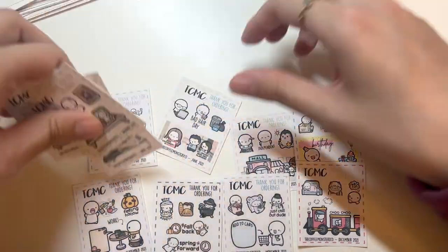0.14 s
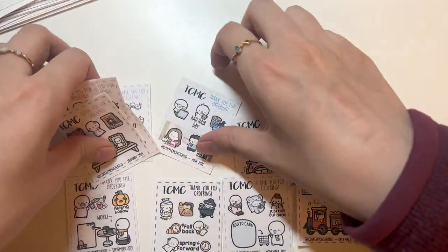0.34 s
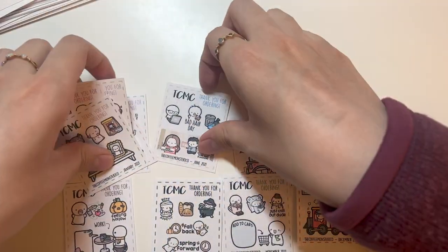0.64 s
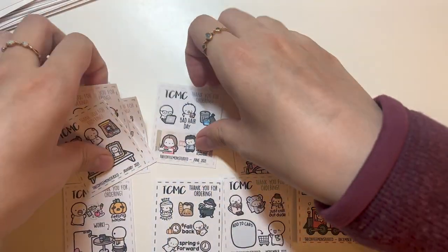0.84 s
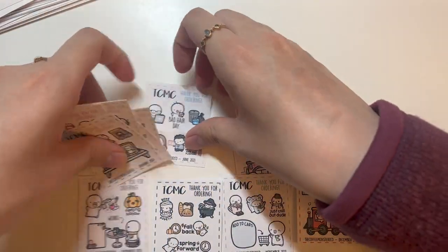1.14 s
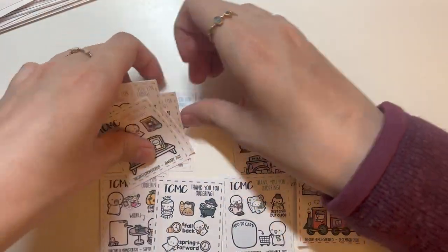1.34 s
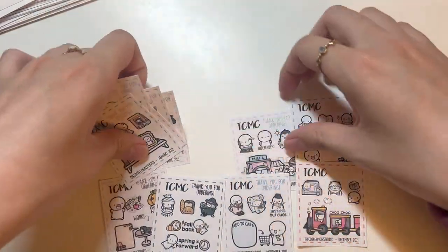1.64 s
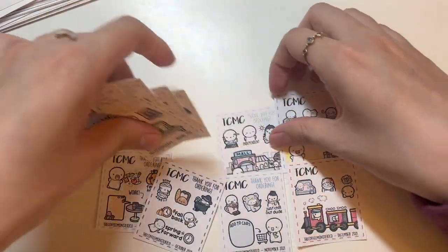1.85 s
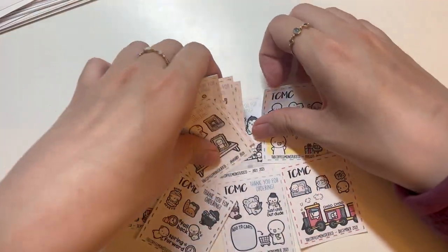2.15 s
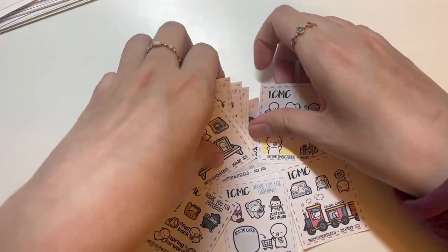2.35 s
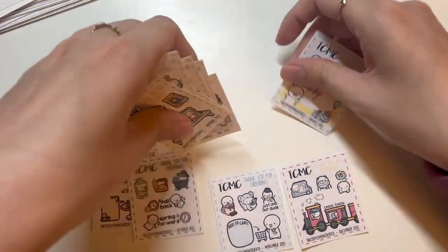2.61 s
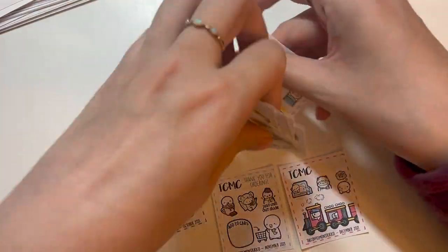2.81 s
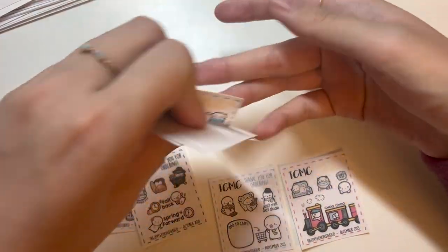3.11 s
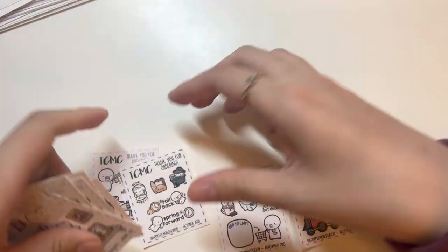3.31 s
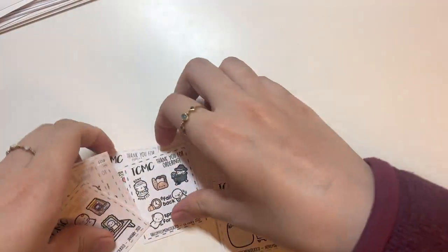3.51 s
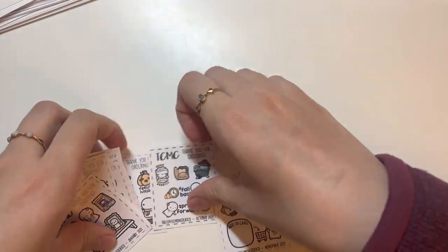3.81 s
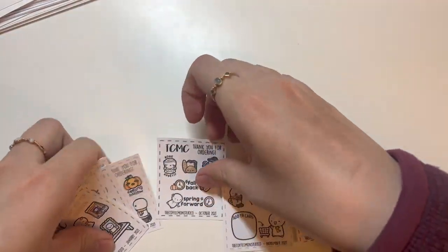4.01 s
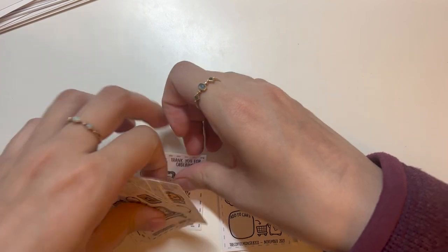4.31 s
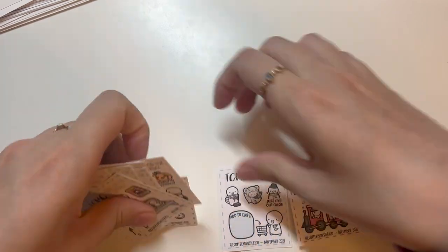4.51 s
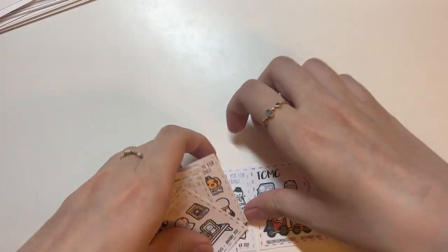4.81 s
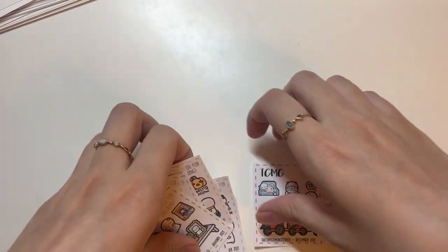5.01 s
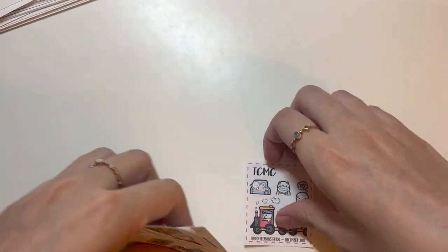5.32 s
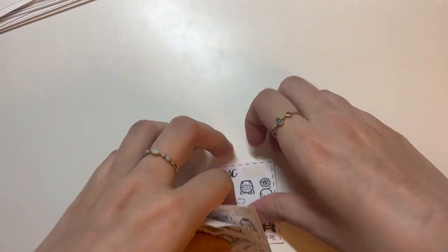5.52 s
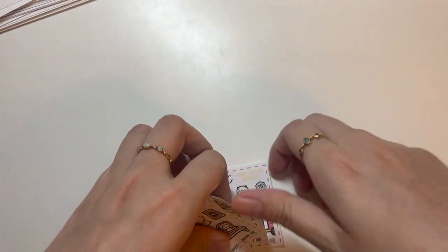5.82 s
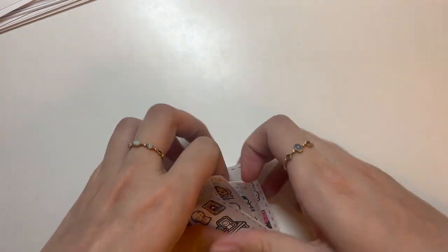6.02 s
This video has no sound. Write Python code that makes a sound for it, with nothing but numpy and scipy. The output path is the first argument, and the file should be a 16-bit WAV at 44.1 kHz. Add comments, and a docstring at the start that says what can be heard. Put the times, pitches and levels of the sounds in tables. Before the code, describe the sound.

Small stiff paper cards are pushed and gathered on a tabletop, close to the microphone. Short, soft, grainy hisses come in uneven strokes, with tiny clicks from card edges and dull fingertip thuds. Rustling grows brighter around two seconds, a sharp snap stands out near four and a half, then the cards shuffle together more continuously. A small quiet room adds faint rumble and hum.

```python
"""Paper hisses first, as small cards are pushed over a table top; then they are picked up and knocked into a stack.
The hiss is grainy shaped noise; card edges snap as millisecond noise bursts through resonances.
Fingertips thud on the table, ringing the modes of its board, and drag on it with a stuttering murmur.
Short wall echoes, low room rumble and a wavering hum lie behind.
Two close microphone ports hear the same sound with a phase turn that grows with pitch."""
import sys
import numpy as np
from scipy import signal
from scipy.fft import rfft, irfft
from scipy.io import wavfile
from scipy.ndimage import uniform_filter1d

SR = 44100
rng = np.random.default_rng(int(sys.argv[2]) if len(sys.argv) > 2 else 0)


def output_pcm(signal):
    """Save a mono or channel-first signal as 16-bit PCM at the path in sys.argv[1].

    Samples are clipped to [-1, 1] before scaling.
    """
    pcm = np.clip(np.atleast_2d(signal).T, -1, 1) * 32767
    wavfile.write(sys.argv[1], SR, np.round(pcm).astype(np.int16))


N = 271215

# strokes of sliding paper: (loudest moment [s], relative hiss level [dB], swell by 20 dB [ms],
# fade by 20 dB [ms], flex of the cards: body below 5.2 kHz re hiss [dB], sheen above 10.2 kHz re hiss [dB])
PAPER_STROKES = [(0.004, -65, 151.0, 55, 5, 9), (0.178, -58.4, 20, 161.0, -4.5, 10),
                 (0.255, -56.5, 50, 48, 5.5, 8), (0.315, -57, 31, 138, 5, 11.5),
                 (0.34, -53, 60, 15, 5.5, 10), (0.39, -55, 38, 40.0, 2, 0.5), (0.442, -59, 8, 80, 5, -1),
                 (0.469, -48, 32, 41, -1, 5), (0.512, -62.5, 29.0, 159.0, 5.5, 5),
                 (0.569, -58.5, 11, 21, 15, 4), (0.61, -67, 30.0, 50.0, 8, 5),
                 (0.659, -68, 21.0, 30.0, 11, 1.5), (0.718, -62, 60, 21.0, 8, 6),
                 (0.788, -67.5, 12, 200, 11.5, 0), (0.86, -65, 146.0, 59, 7, 5),
                 (0.947, -58, 100, 62, 3.7, 6), (0.985, -58, 27, 18, 9, 3), (1.05, -62, 17, 200, 10.5, 8),
                 (1.143, -52.5, 110.0, 205, 1.9, 5), (1.265, -54.5, 65, 73.0, 6.5, 2),
                 (1.373, -53.5, 60.0, 18, -1, -3), (1.479, -63, 167.0, 47.0, 3, 4),
                 (1.522, -59.5, 54.0, 58, 11, -1), (1.627, -55, 76.0, 32, 2.3, -0.3),
                 (1.695, -43, 10, 52, 0, -4), (1.705, -43.5, 56, 35, -3.3, -5),
                 (1.936, -56.5, 183, 80.0, -3.5, 6), (2.02, -67, 40.0, 60.0, 0, -4),
                 (2.105, -59, 14, 100, -2, -2), (2.131, -54.5, 189, 104, 1.5, 1),
                 (2.265, -62, 81.0, 103.0, 4.5, 1), (2.317, -63, 19, 188.0, -8, -1),
                 (2.426, -45.5, 65, 35, 3.5, -9), (2.502, -43.5, 86, 128, -5, -7),
                 (2.756, -60.5, 146, 36.0, 0.5, 5), (2.85, -55.5, 91.0, 123, 3, 6.5),
                 (2.972, -56, 21, 126, -3, 7.5), (3.058, -53.5, 6, 60.0, 2.5, 2),
                 (3.185, -49.5, 35, 40, 0, 2), (3.36, -71.0, 56, 100.0, 1.0, 11),
                 (3.437, -60, 106.0, 98, 3, -2.0), (3.522, -57, 60, 98.0, -4, 2),
                 (3.581, -58, 33.0, 79.0, 3, 7), (3.741, -51, 133, 138, -3, -2.5),
                 (3.865, -56.5, 27.5, 108, 3.5, -2), (3.947, -46, 12, 60, 3, -5),
                 (4.083, -51.5, 121, 94, 4, 4.5), (4.323, -57, 207, 14.0, 3.3, 4),
                 (4.389, -56, 85.0, 21, 3, 5), (4.435, -44.5, 19.5, 107, 5.5, -4),
                 (4.667, -52, 23, 214, -6, 2.5), (4.775, -49.5, 50, 95, 3, -0.5),
                 (4.915, -67, 15, 199, 2, -3), (4.952, -57.5, 117.0, 259.0, 8, 4),
                 (5.109, -58, 97, 22, 10, 7), (5.211, -52.5, 182.0, 83, -2.5, 1.5),
                 (5.345, -57, 13, 103, -14, 9), (5.39, -50.6, 103.0, 128, -5.5, 2.5),
                 (5.633, -55, 118, 50.0, 4.5, 4), (5.694, -48.5, 34, 57.0, -10, -8),
                 (5.8, -68, 100.0, 100.0, 1.0, -9), (5.878, -51, 213.0, 64.0, -0.2, -6),
                 (5.968, -51, 97, 34, 2.5, 4), (6.07, -63, 15, 200, 3, 3),
                 (6.121, -52.5, 294.0, 152.0, 4.5, -0.5)]
# colour of sliding paper: (frequency [Hz], relative level per Hz [dB])
PAPER_COLOUR = [(300, -20.5), (800, -10), (1500, -6.5), (2000, -3), (2700, 2.5), (3300, 0), (4200, -1),
                (5100, 4), (6500, 2.9), (9000, 2), (12000, -2.5), (14800, -6.5), (17000, -52)]
BODY_LINGERS = 1.085  # the body of a stroke fades this many times slower than its hiss

# card edges snapping: (time [s], relative peak level [dB], pitch [Hz], time to scrape peak [ms],
# relative level of the hollow knock [dB], relative level of the crackle [dB])
EDGE_SNAPS = [(0.1697, -47, 7950, 0.85, -33, -20), (0.248, -50, 5070, 0.85, -8, 5),
              (0.405, -46, 4040, 1, -18, -16), (0.4374, -62, 3280, 0.91, -21, -19),
              (0.5632, -30.5, 8070, 0.99, -20, 28), (0.5709, -30, 5040, 1, -6.5, -9),
              (0.6541, -43, 3530, 0.94, 3, -2), (0.7213, -42.5, 5280, 1, -1, -5),
              (0.968, -37.5, 3040, 1, -17, -5), (1.2971, -41, 3200, 0.62, -16, -10),
              (1.3633, -40, 4630, 1, 0, -11), (1.375, -44.5, 4940, 0.85, 3, -6),
              (1.475, -34.5, 3240, 1, -6, -6.5), (1.5195, -29.5, 3120, 0.71, -5.5, -15),
              (1.6541, -38, 4140, 1, -5.5, -6), (1.9275, -54, 6990, 0.9, -31, -6),
              (2.0502, -43.5, 4910, 1, 0, -17), (2.2641, -43.5, 4160, 0.74, 1, -14),
              (2.321, -42.5, 5240, 0.95, -22, -11), (2.412, -24, 4500, 0.43, -9.5, -29),
              (2.7915, -47, 7120, 0.97, -4, -1), (2.83, -39.5, 5100, 0.98, 13, -8),
              (2.919, -32, 5300, 0.85, -5.5, -8.5), (3.0603, -34, 6200, 1, -6.5, -25),
              (3.111, -45.5, 2930, 0.95, 9, -8), (3.1692, -45, 8370, 0.93, -27, 0),
              (3.411, -41, 4730, 1, -21, -26), (3.4525, -49, 3060, 0.69, -16, -12),
              (3.683, -40.5, 3760, 1, -3, -5), (3.8648, -42, 4890, 0.84, -18, -20),
              (3.946, -22, 3050, 1, -32, -6), (4.247, -42.5, 3930, 0.63, -34, -2),
              (4.4352, -5.5, 5320, 0.71, -7, -30), (4.6125, -45, 5200, 0.85, -8, -6),
              (4.666, -42, 5700, 0.81, -34, -29), (4.7755, -42, 8370, 0.97, -25, -14),
              (4.8907, -33, 2400, 0.62, -26, -35), (5.103, -33, 8100, 0.61, 5, 8),
              (5.8583, -35.5, 7850, 1, -6, -18), (5.953, -51, 2900, 0.71, -22, -16),
              (5.9668, -26.5, 5700, 1, -8, -24), (6.1386, -24, 4600, 0.33, -5, -21)]
KNOCK_HZ, CRACKLE_HZ = 1850, 10030

# fingertips landing: (time [s], relative level [dB], weight: tilt at 100 Hz and below [dB],
# nail hardness: relative tilt at 1 kHz and above [dB])
FINGER_THUDS = [(0.252, -34.5, -9.5, -10), (0.261, -30.5, -34, -17), (0.404, -41, -19.5, -11),
                (0.527, -39.5, -15, -6.5), (0.654, -34.5, -17, -13.5), (0.722, -41.5, -14, -13),
                (0.876, -37.5, -24, -13), (0.891, -39, -23, -11), (0.989, -52, -9, -21),
                (1.248, -52, -9, -15), (1.295, -29, -18.5, -15), (1.373, -50.5, 0, -7),
                (1.656, -34, -17.5, -13.5), (2.05, -29.5, -17.5, -14.5), (2.172, -53, -4, -4),
                (2.408, -45.5, -9, 0), (2.83, -72, -11, 20), (2.918, -51.5, -38, -11),
                (3.06, -56, -30, -11), (3.205, -62, 4, 9.5), (3.222, -73, -3, -15),
                (3.41, -32.5, -7.5, -10.5), (3.454, -40, -18, -10.5), (3.503, -41, -39, -10),
                (3.598, -45, -9, -13), (3.617, -47.5, -16, -8), (3.682, -41, -13.5, -7.5),
                (3.785, -50.5, -1.5, -6), (3.869, -38.5, -12.5, -11.5), (4.062, -54, -14, -7),
                (4.309, -67.5, -9, 15), (4.611, -45, -10, -14), (4.776, -34.5, -13.5, -12),
                (4.875, -47, -4.5, -3.5), (5.135, -51, -10, -6), (5.157, -40.5, -20, -12.5),
                (5.335, -58.5, 6, -18), (5.546, -62, 13.5, 8), (5.704, -40.5, -19, -12),
                (5.781, -53, -8, -3), (5.861, -44.5, -7.5, -12), (5.946, -45, -26, -20.5),
                (5.968, -42.5, -14.5, -11), (6.07, -49, -13, -1.5)]
# main modes of the table top: (frequency [Hz], relative level [dB], nominal t60 [s])
BOARD_MODES = [(60.9, 8.5, 0.53), (85.3, 19.5, 0.086), (115.6, 3, 0.75), (186.3, -4, 0.28),
               (235.4, -7.5, 0.14), (285.8, -6.5, 0.21), (340.6, -17, 0.24), (430.7, -6.5, 0.12),
               (531.4, 1, 0.059), (632, -13, 0.26), (797, -13.5, 0.12), (971, -2.5, 0.03),
               (1230, -5.5, 0.05), (1496, -6, 0.03)]
# colour of the first bending wave: (frequency [Hz], relative level per Hz [dB])
WAVE_FRONT = [(60, -31), (200, 4.5), (450, 9.5), (900, -7.5), (1600, -22), (2600, -23)]

# fingers dragging on the board: (start [s], hold [s], murmur of the middle modes [dB],
# coarse scrape in the high modes [dB])
FINGER_DRAGS = [(0.0, 0.0057, -61.5, -72), (0.3, 0.13, -49, -56), (0.432, 0.091, -48, -64),
                (0.55, 0.039, -52.5, -59), (0.67, 0.14, -53, -59.5), (0.85, 0.11, -54.5, -56),
                (1.0, 0.21, -59.5, -63), (1.32, 0.04, -45.5, -57), (1.48, 0.053, -59, -63.5),
                (1.68, 0.043, -51, -76), (1.8, 0.21, -66, -65.5), (2.07, 0.039, -45, -51.5),
                (2.19, 0.14, -59.5, -63.5), (2.41, 0.0096, -56, -52.5), (2.77, .02, -69, -69),
                (2.83, 0.037, -85, -56.5), (2.92, 0.062, -83, -70), (2.965, 0.022, -86, -61),
                (3.06, .15, -89, -66.5), (3.42, 0.16, -52, -54), (3.59, 0.019, -49.5, -56.5),
                (3.7, .12, -55.5, -56.5), (3.87, .1, -55.5, -68), (4.1, 0.11, -88, -71),
                (4.32, 0.21, -70, -69), (4.62, 0.097, -53.5, -70), (4.75, 0.12, -57.5, -55.5),
                (4.88, 0.019, -49, -60), (5.13, 0.14, -54, -58.5), (5.3, 0.52, -58.5, -56.5),
                (5.59, 0.068, -51.5, -47), (5.7, 0.087, -58.5, -55.5), (5.8, .09, -60, -52),
                (5.95, 0.071, -52.5, -53), (6.05, 0.14, -55, -60)]
GRIP_DB_PER_S, SAG_DB_PER_S, LIFT_DB_PER_S = 612, 23, 190  # grips fast, sags while held, dies when lifted

# decay of the wall echoes: (frequency [Hz], t60 [s])
ROOM_DECAY = [(300, 0.3), (2000, 0.17), (6000, 0.091), (14000, 0.019)]
# colour of the quiet room: (frequency [Hz], relative level per Hz [dB])
ROOM_AIR = [(19, -37), (32, 9), (65, -3), (145, -7), (203, -14), (359, -28), (1750, -48), (2160, -24.5),
            (2460, -56), (4590, -39), (5650, -62), (6110, -42), (9270, -83), (12300, -36), (16000, -52)]
AIR_DB, HUM_DB, HUM_HZ = -61.5, -69.5, 120  # levels ahead of the ports

# the port pair: (frequency [Hz], phase lead of left [rad], left-right balance [dB], likeness [0-1])
PORT_PAIR = [(100, 0, -1, .99), (250, -.4, -1.5, .96), (500, -.9, -4, .88), (900, -.4, -2.5, .85),
             (1300, -.2, .6, .9), (1800, .1, -.3, .9), (2700, 2.4, -1.6, .75), (3300, 1.3, -2, .7),
             (4700, 1.1, -2.5, .6), (5400, 2.1, -.3, .97), (6000, 3.14, 0, 1), (8100, 6.28, 0, 1),
             (10200, 9.42, 0, 1), (12400, 12.57, 0, 1), (14900, 15.7, 0, 1), (17000, 18.5, 0, 1)]
LOW_CUT_HZ, EDGE_HZ = 40, 15700


def slide(patchy_db=2.5, flicker_db=2.0, grain_db=0.5):
    """Fibres catching on fibres: dense grains, tinted by how the cards bend, with wandering bright patches."""
    hz = np.fft.rfftfreq(256, 1 / SR)[:, None]
    t = np.arange(N // 64 + 5) * 64 / SR
    s, db, swell_ms, fade_ms, flex_db, sheen_db = np.transpose(PAPER_STROKES)[:, :, None]
    ms = (t - s) * 1000
    rise_db = 20 * np.minimum(ms, 0) / np.maximum(swell_ms, 1)
    fall_db = 20 * np.maximum(ms, 0) / np.maximum(fade_ms, 1)
    hiss_db = summed(db + rise_db - fall_db)
    body_db = summed(db + flex_db + rise_db - fall_db / BODY_LINGERS)
    top_db = summed(db + sheen_db + rise_db - fall_db)

    patches = rng.standard_normal((len(t), len(hz))).T
    patches = uniform_filter1d(patches, size=2, axis=0)
    patches = evened(uniform_filter1d(patches, size=50, axis=1))
    flicker = evened(uniform_filter1d(rng.standard_normal(len(t)), 6))  # the stroke is uneven

    low = 1 / (1 + (hz / 5200) ** 8)
    high = 1 / (1 + (10200 / (hz + 1)) ** 8)
    bands_db = low * body_db + (1 - low - high) * hiss_db + high * top_db
    field_db = read(PAPER_COLOUR, hz[:, 0])[:, None] + bands_db + 8.0
    field_db = field_db + patchy_db * patches + flicker_db * flicker
    grains = gain_of(grain_db * uniform_filter1d(rng.exponential(1, N), 3))
    return noise(field_db, 256) * evened(grains)


def snaps(after_db=-33.0):
    """A scraping edge comes free and rings the bent card, the hollow of the hand and, faintly, the stack."""
    out = np.zeros((2, N))
    t = np.arange(2048) / SR
    hz = np.fft.rfftfreq(2048, 1 / SR)
    bursts = rng.standard_normal((len(EDGE_SNAPS), 2, 2048))
    for (s, db, pitch_hz, scrape_ms, knock_db, crackle_db), burst in zip(EDGE_SNAPS, bursts):
        card = ring(hz, pitch_hz, .4 * pitch_hz) ** 2
        knock = gain_of(knock_db + 2.5) * ring(hz, KNOCK_HZ, 1300.0) ** 2
        crackle = gain_of(crackle_db - 2.5) * ring(hz, CRACKLE_HZ, 8500.0) ** 2
        stack = gain_of(-10.5) * ring(hz, 840, 460.0)
        colour = card + knock + crackle + stack

        u = t * 1000 / max(scrape_ms, .15)
        tremble = gain_of(after_db - 60 * t / 0.016) * np.minimum(u, 1)  # the card trembles on
        shape = u ** 2 * np.exp(2 - 2 * u) + tremble
        scrape = rfft(burst * shape)
        # flattened, so that it excites all pitches alike
        scrape = scrape / np.sqrt(uniform_filter1d(abs(scrape) ** 2, size=30, axis=1))
        snap = irfft(scrape * colour * ring(hz, 6100, 20000.0))
        snap = snap / abs(snap).max(1, keepdims=True)
        add(out, s, gain_of(db + np.array([[2.5], [-5]])) * snap)
    return out


def thuds(modes):
    """Each landing spot shakes the modes in its own proportion; the soft fingertip settles in aftershocks."""
    out = np.zeros((2, N))
    t = np.arange(1600) / SR
    chance = rng.random((len(FINGER_THUDS), 2, 2, len(modes), 1))
    jolts = rng.standard_normal((len(FINGER_THUDS), 1600))
    jolts = jolts * (rng.random((len(FINGER_THUDS), 1600)) < 200. / SR)  # about 200 a second
    jolts = 0.19 * jolts * np.exp(-t / 0.0079) + (t == 0)  # the landing itself comes first
    for (s, db, weight_db, hard_db), draws, jolt in zip(FINGER_THUDS, chance, jolts):
        tilt = [(100, weight_db), (200, 0), (600, 0), (1000, hard_db + 11)]
        tilt_db = read(tilt, modes[:, 0])[:, None]
        rings = np.array([board(modes, -7 + tilt_db + 6.7 * (spot - .5), 0.46 * phase)
                          for spot, phase in draws])
        rings = gain_of(db) * (rings + gain_of([[1.5], [-8]]) * front(tilt))
        add(out, s, signal.fftconvolve(rings, jolt[None] / np.linalg.norm(jolt), axes=1))
    return out


def board(modes, strength_db, phases, travel_s=0.00895):
    """The table top rings; bending waves carry high pitches faster, so the low modes start late and swell."""
    hz, db, t60 = np.transpose(modes)[:, :, None]
    delay_s = travel_s * (100 / hz) ** 0.673
    t = np.maximum(np.arange(SR // 3) / SR - delay_s, 0)
    rings = np.sin(2 * np.pi * (hz * t + phases)) * gain_of(db + strength_db - 60 * t / t60)
    return (rings * (1 - np.exp(-t * hz / 0.16))).sum(0)


def front(tilt, travel_s=0.009586, spread=.75):
    """The first bending wave: one push spread into a falling sweep, since low pitches travel slower."""
    hz = np.fft.rfftfreq(4096, 1 / SR)
    cycles = travel_s * 100 ** spread * hz ** (1 - spread) / (1 - spread)
    shape = gain_of(read(WAVE_FRONT, hz)) * np.exp(-2j * np.pi * cycles)
    wave = irfft(shape * gain_of(read(tilt, hz))) / abs(irfft(shape)).max()
    return np.pad(wave, (0, SR // 3 - 4096))


def crowd(weak_db=-3.0, count=30):
    """The main modes of the board, and a crowd of weaker, shorter ones between them."""
    hz = np.geomspace(72, 2300, count)
    db, t60 = read(BOARD_MODES, hz)
    weaker_db = db + weak_db - 0.8 * np.log2(np.maximum(hz / 1450, 1))
    return np.vstack([BOARD_MODES, np.transpose([hz, weaker_db, 0.31 * t60])])


def drag(modes, damping=0.99, stutter_db=2.5):
    """Skin stutters over the board and keeps its modes murmuring; damping scales their widths."""
    hz = np.fft.rfftfreq(1024, 1 / SR)[:, None]
    t = np.arange(N // 256 + 5) * 256 / SR
    s, hold_s, *levels_db = np.transpose(FINGER_DRAGS)[:, :, None]
    grip_db = GRIP_DB_PER_S * np.minimum(t - s, 0)
    sag_db = SAG_DB_PER_S * np.maximum(t - s, 0)
    lift_db = LIFT_DB_PER_S * np.maximum(t - s - hold_s, 0)
    shape_db = grip_db - sag_db - lift_db

    peaks = ring(hz, modes[:, 0], damping * 2.2 / modes[:, 2]) * gain_of(modes[:, 1])
    colour = np.sqrt((abs(peaks) ** 2).sum(1, keepdims=True))
    reach = [evened(colour * bump(hz, centre_hz, 1.0)) for centre_hz in (420, 1300)]  # murmur, scrape
    power = sum((shape * gain_of(summed(db + shape_db))) ** 2 for shape, db in zip(reach, levels_db))
    stutter = evened(uniform_filter1d(rng.exponential(1, N) - 1, 150))
    return noise(10 * np.log10(power + 1e-20), 1024) * evened(gain_of(stutter_db * stutter))


def room(x):
    """A bunch of wall echoes within sparse taps of random sign, each band dying at its own speed."""
    taps = np.zeros((2, SR // 2))
    at = np.arange(100, SR // 2 - 20, 20) + rng.integers(0, 20, (2, (SR // 2 - 101) // 20))
    np.put_along_axis(taps, at, rng.choice([-1., 1.], at.shape), 1)
    # the bunch stands out around 12.5 ms
    taps *= 1 + 2.4 * np.exp(-((np.arange(SR // 2) / SR - .0125) / 0.0016) ** 2)
    hz, t, z = signal.stft(taps, SR, nperseg=128)
    decay = gain_of(-60 * t / read(ROOM_DECAY, hz)[:, None])
    tail = signal.istft(z * decay, SR, nperseg=128)[1]
    return signal.fftconvolve(x, tail / np.linalg.norm(tail[0]), axes=1)[:, :N]


def air():
    """Low room rumble as shaped noise, with a wavering mains hum as a narrow band of noise."""
    hz = np.fft.rfftfreq(2048, 1 / SR)
    hum_db = HUM_DB + 20 * np.log10(evened(bump(hz, HUM_HZ, 0.24)) + 1e-9)
    steady = np.zeros(N // 512 + 5)
    rumble = noise(read(ROOM_AIR, hz)[:, None] + steady, 2048)
    hum = noise(hum_db[:, None] + steady, 2048)
    return gain_of(AIR_DB) * evened(rumble) + hum


def noise(db, size):
    """Two unrelated noises with short-time spectra on a bins x frames field; 0 dB everywhere is rms 1."""
    a, b = rng.standard_normal((db.shape[1], db.shape[0], 2, 2)).T
    z = (a + 1j * b) * gain_of(db)
    return signal.istft(z, nperseg=size, noverlap=size * 3 // 4)[1][:, :N] / np.sqrt(size / 1.33)


def ring(hz, centre_hz, width_hz):
    """Frequency response of one damped resonance, 1 at its centre."""
    return 1j * hz * width_hz / (centre_hz ** 2 - hz ** 2 + 1j * hz * width_hz)


def bump(hz, centre_hz, octaves):
    """A bell on the log-frequency axis, top 1."""
    return np.exp(-.5 * (np.log2((hz + 1) / centre_hz) / octaves) ** 2)


def read(points, hz):
    """Every column of a table over log frequency."""
    f, *columns = np.transpose(points)
    return np.squeeze([np.interp(np.log(hz + 1), np.log(f + 1), c) for c in columns])


def gain_of(db):
    """Decibels to a factor."""
    return 10 ** (np.asarray(db) / 20)


def summed(db):
    """Level in dB of overlapping sounds, one per row."""
    return 10 * np.log10((gain_of(db) ** 2).sum(0) + 1e-14)


def evened(x):
    """Scales to rms 1."""
    return x / np.sqrt(np.mean(abs(x) ** 2) + 1e-20)


def add(mix, s, sound):
    """Mixes a sound in at a time in seconds."""
    part = mix[:, round(s * SR):][:, :sound.shape[1]]
    part += sound[:, :part.shape[1]]


def scene():
    """Two versions of the sound field for the microphone ports to blend."""
    cards = slide() + snaps()
    modes = crowd()
    return cards + gain_of(-16) * room(cards) + thuds(modes) + drag(modes) + air()


def record(dry):
    """Both ports share one field up to their likeness, turned in phase against each other; then band limits."""
    turn, balance_db, same = read(PORT_PAIR, np.fft.rfftfreq(512, 1 / SR))
    angle = np.arccos(np.clip(same, 0, 1)) / 2
    lean = gain_of(balance_db / 2) * np.exp(.5j * turn)
    left = [np.cos(angle) * lean, np.sin(angle) * lean]
    right = [np.cos(angle) / lean, -np.sin(angle) / lean]
    taps = np.roll(irfft(np.array([left, right])), 256, axis=2)[:, :, 1:] * np.hanning(511)
    ports = np.array([signal.oaconvolve(dry, pair, "same", axes=1).sum(0) for pair in taps])
    ports = signal.sosfilt(signal.butter(6, LOW_CUT_HZ, "high", fs=SR, output="sos"), ports)
    low_pass = signal.firwin(511, EDGE_HZ, window=("kaiser", 9), fs=SR)
    return signal.oaconvolve(ports, low_pass[None], "same")


dry = scene()
out = record(dry)
output_pcm(out)
```